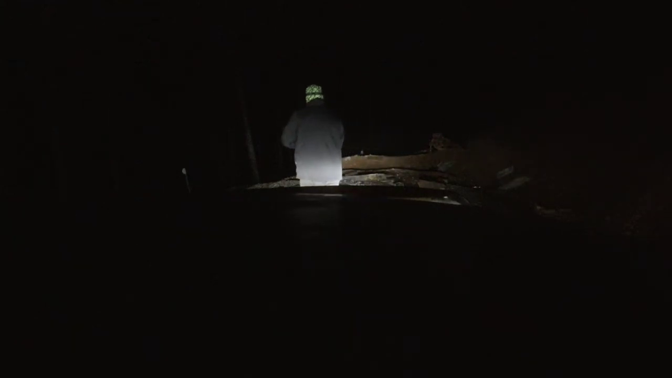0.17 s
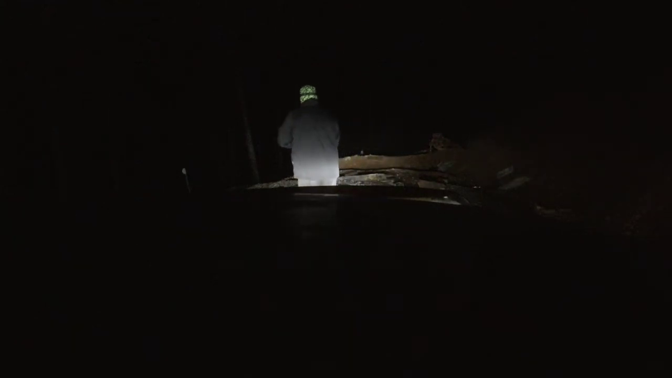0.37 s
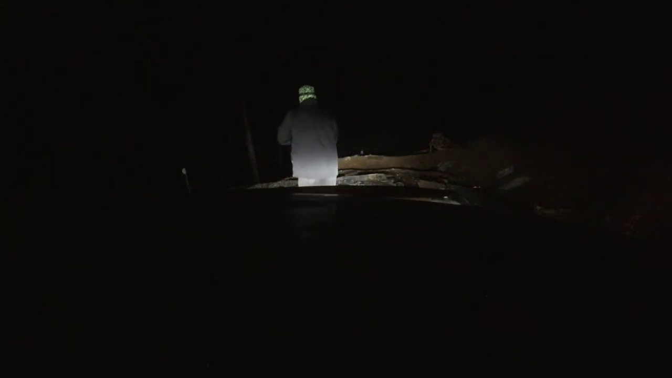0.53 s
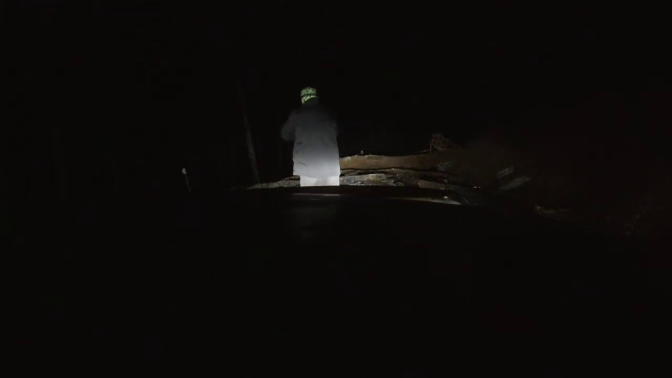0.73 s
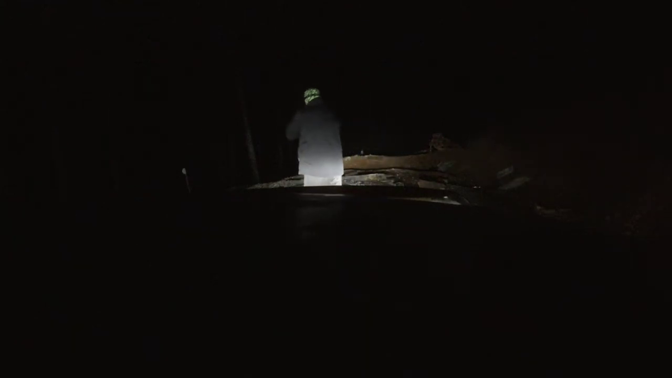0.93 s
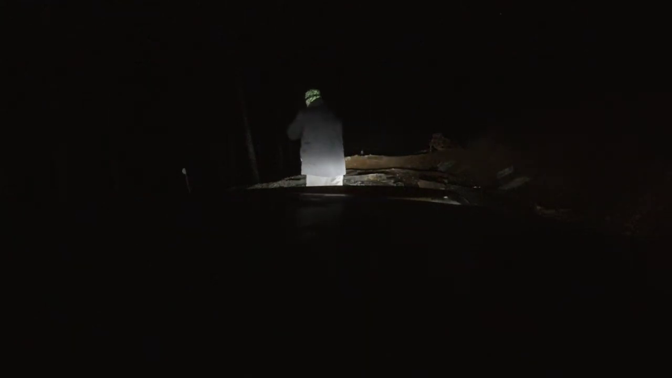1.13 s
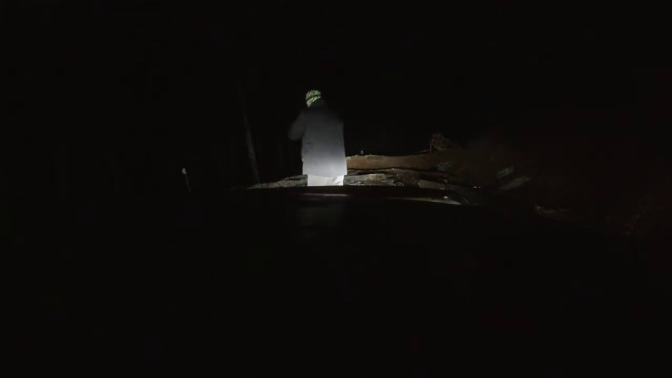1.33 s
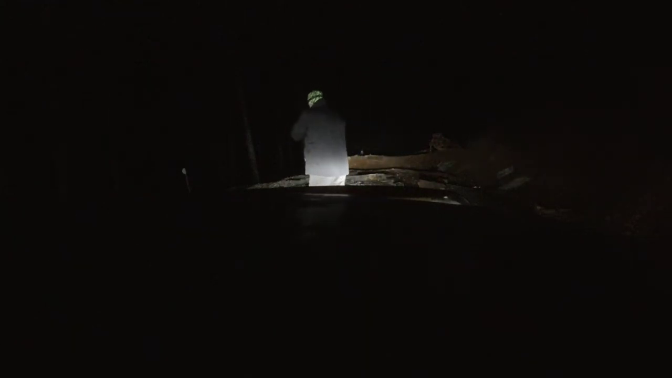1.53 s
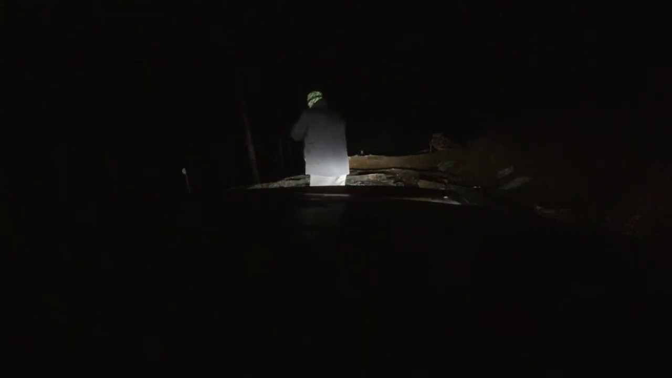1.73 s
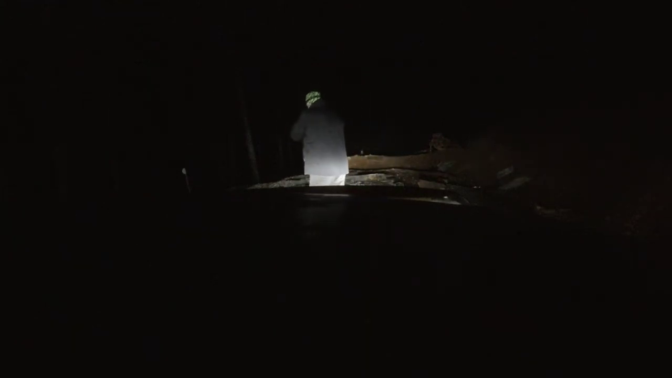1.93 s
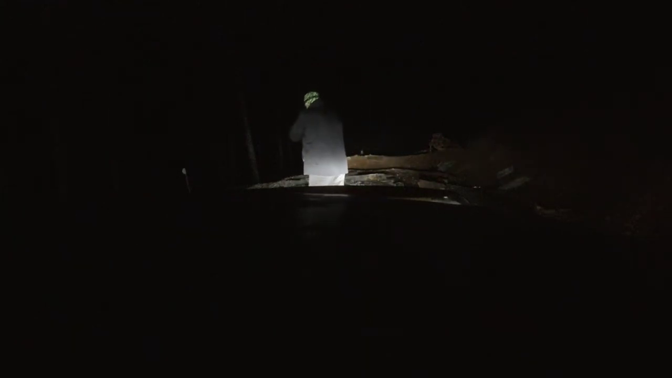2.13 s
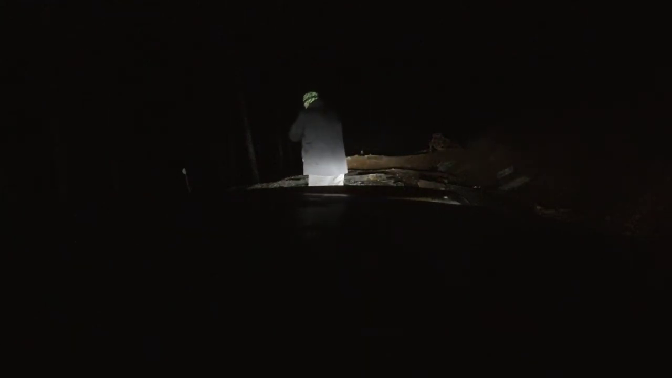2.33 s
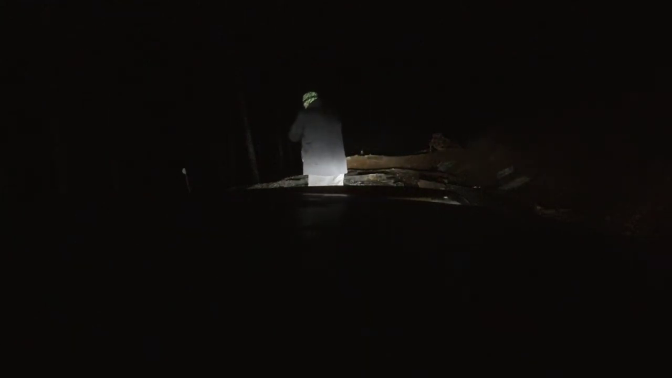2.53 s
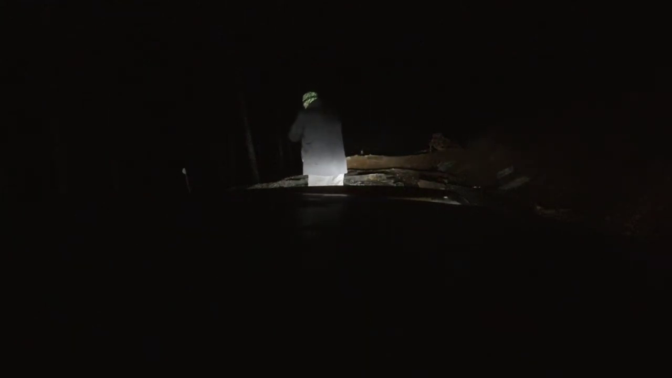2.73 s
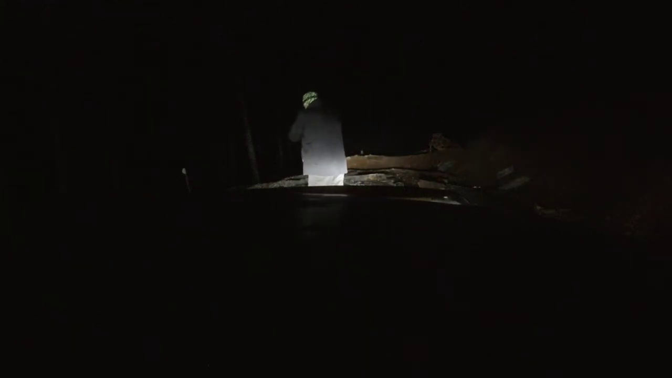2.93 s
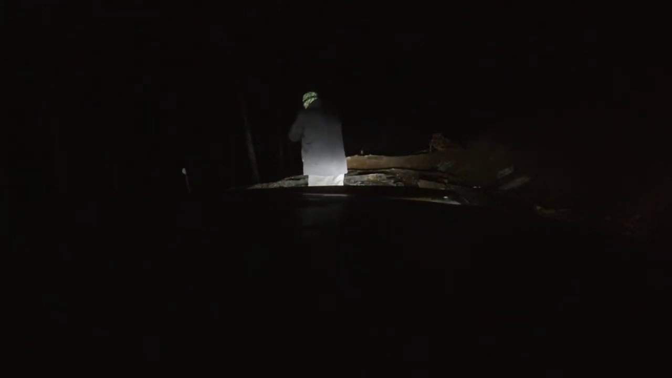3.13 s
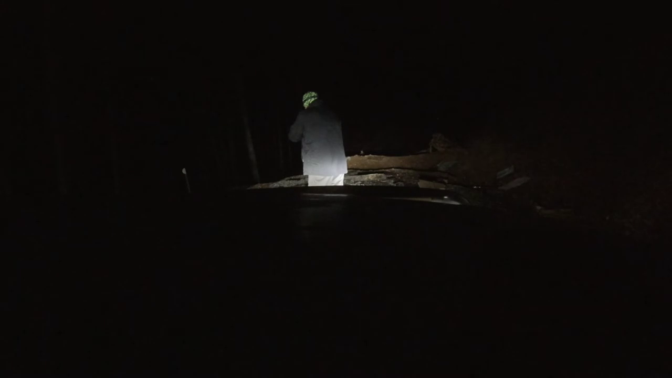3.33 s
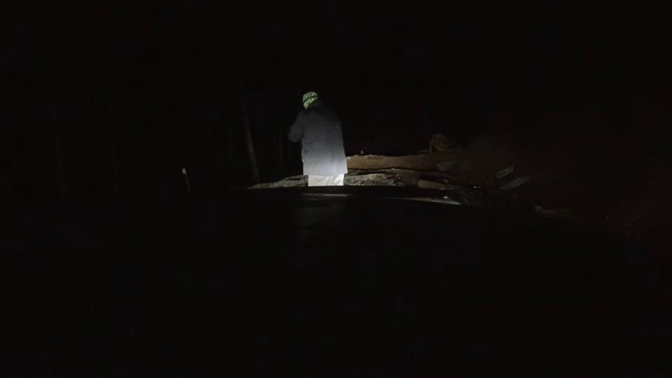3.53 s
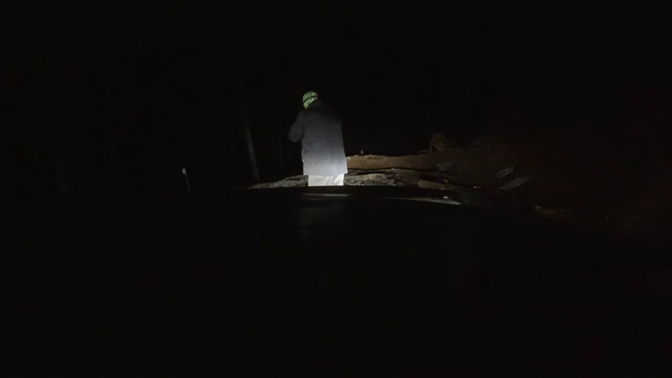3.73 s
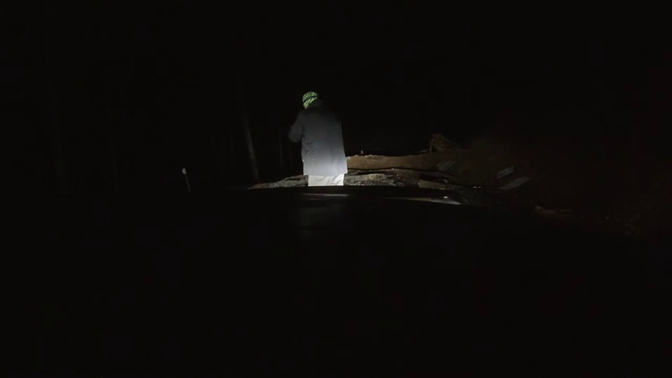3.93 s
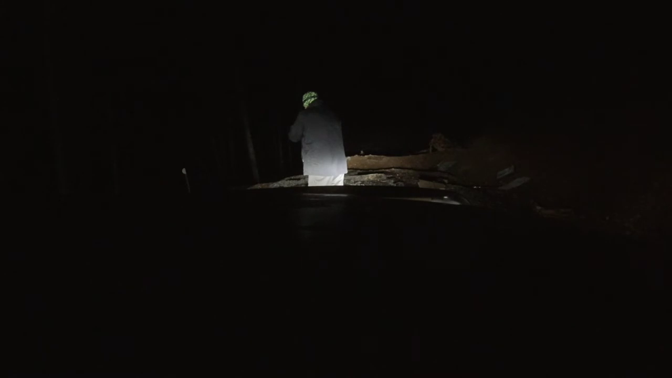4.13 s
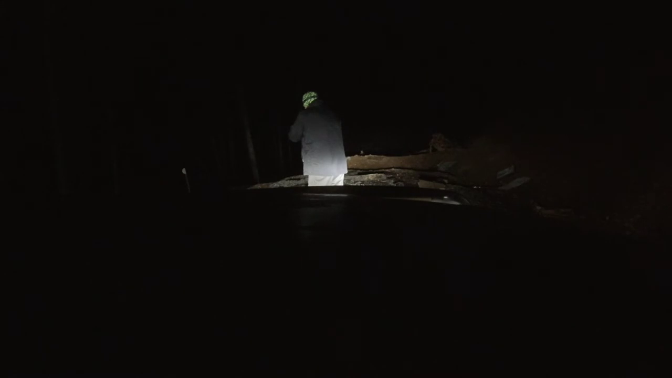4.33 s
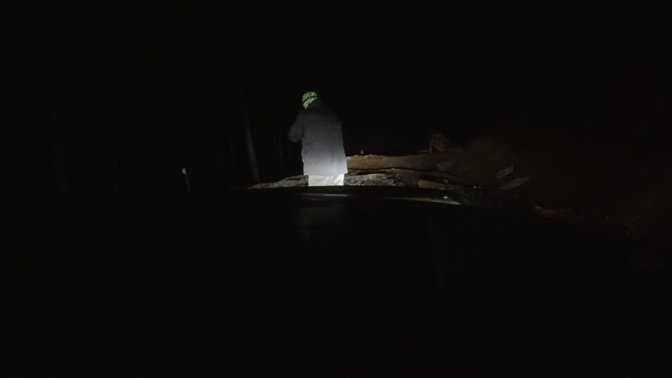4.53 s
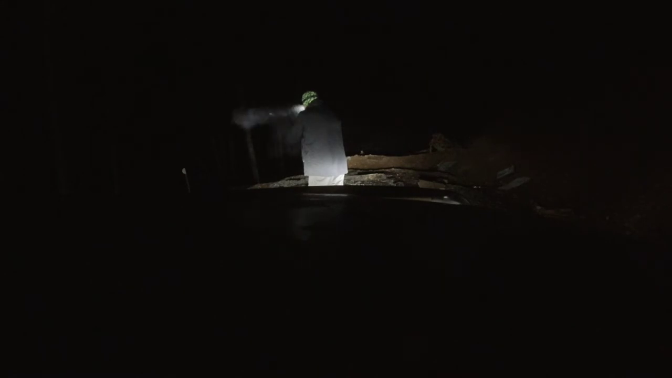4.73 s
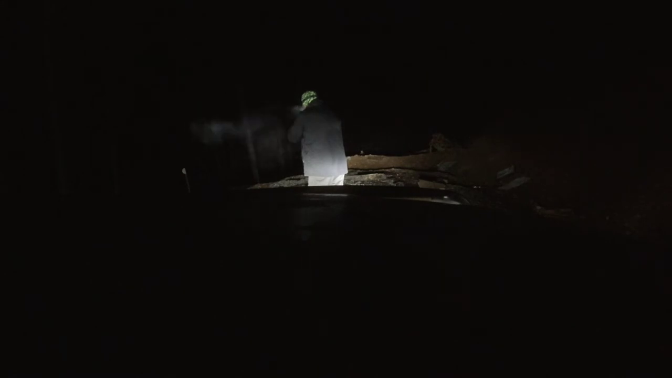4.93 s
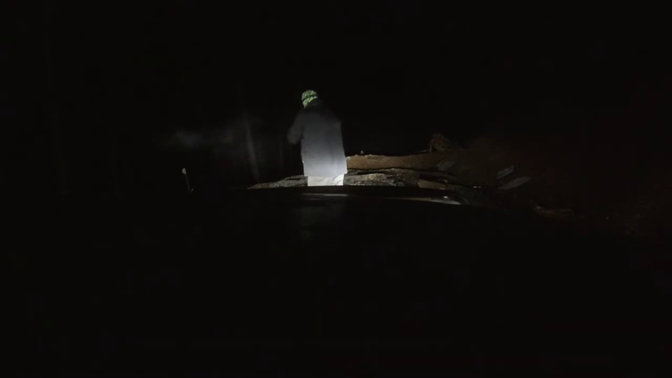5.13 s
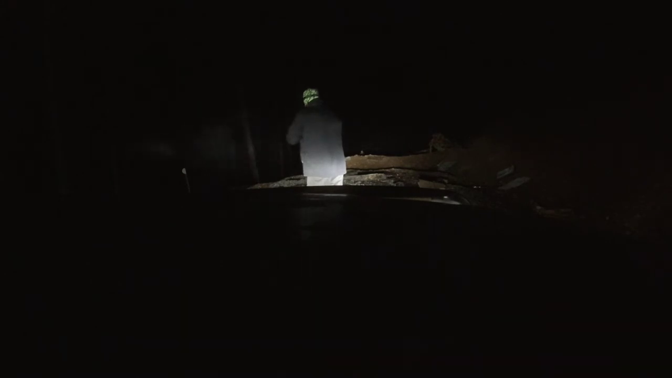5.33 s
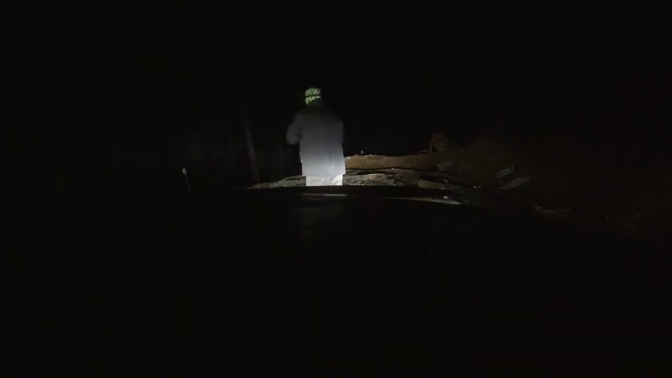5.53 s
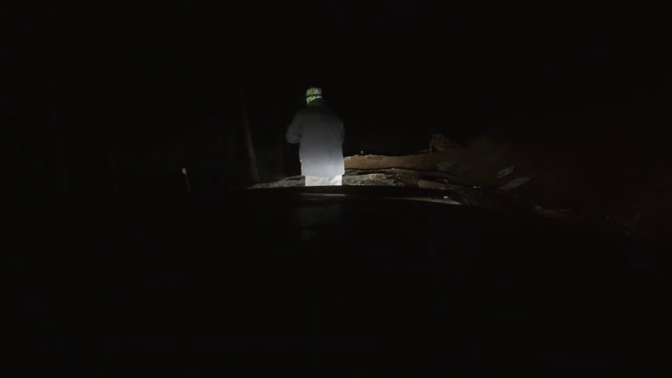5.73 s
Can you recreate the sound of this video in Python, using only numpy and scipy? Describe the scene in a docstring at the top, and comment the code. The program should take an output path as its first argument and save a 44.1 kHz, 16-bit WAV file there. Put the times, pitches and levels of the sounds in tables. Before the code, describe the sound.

Night, outdoors by a wood, heard through a camera microphone near an idling vehicle. From the start its fan gives a quiet, steady low hum near 190 Hz inside a soft rush of air, growing slightly in the first second. Light wind thumps and flutters deep and low, with a stronger buffet around 3.7 s; faint dry rustling stirs, most noticeably near 0.2 s, and a tiny tick comes at 3.4 s. At about 4.64 s a single pistol shot goes off close ahead: a hard, saturated crack and throaty roar with a bright sizzle and short metallic panel ring. Slapping reflections follow within 0.3 s, with crisp cracks from downrange at about 4.95 s. Dense echoes through the trees decay and lose treble; a dull boom swells from the far slope around 5.4 s, then fades. The hum and wind remain strongly ducked afterward.

```python
"""Edge of a wood at night: one shot from a short rifle-calibre pistol, a few metres ahead of an idling vehicle.
Pressure fronts, a noise roar and sharp cracks make the blast; damped sines ring the vehicle's panels.
Decaying noise is the scatter from the trees, a dull noise swell the far slope, and cracks return from downrange.
The vehicle's fan (blade tone and rush of air) hums under light wind, faint rustling and one tick.
The blast saturates the camera's microphone, and its gain control then ducks everything."""
import sys
import numpy as np
from scipy import signal
from scipy.fft import rfft, irfft
from scipy.io import wavfile

SR = 44100
rng = np.random.default_rng(int(sys.argv[2]) if len(sys.argv) > 2 else 0)


def unload_audio(sound):
    """Save the sound as a 16-bit wav file, at the path given as the first command line argument."""
    columns = np.transpose(np.atleast_2d(sound))
    # keep every value between -1 and 1, then stretch to whole-number steps
    steps = np.round(np.clip(columns, -1, 1) * 32767)
    wavfile.write(sys.argv[1], SR, steps.astype(np.int16))


N = 259749
TIME = np.arange(N) / SR
SHOT_S = 4.6351
AGE = np.maximum(TIME - SHOT_S, 0)  # seconds since the shot
# left-right likeness of sound that arrives through the air: [f/Hz, likeness 0-1]
AIRBORNE_LIKENESS = [(60, 0.9), (130, 0.95), (300, 0.97), (640, 0.95), (1400, .72), (3100, 0.2),
                     (6000, .05), (15000, 0.7)]


def amp(db):
    """Decibels to gain."""
    return 10 ** (np.asarray(db) / 20)


def unit(x):
    """Scales to rms 1."""
    return x / np.sqrt(np.mean(x ** 2) + 1e-20)


def curve(rows):
    """Joins (t/s, value) points by straight lines, at every sample."""
    return np.interp(TIME, *np.transpose(rows))


def read(points, hz):
    """Reads a spectrum table on a log-frequency axis."""
    f, value = np.transpose(points)
    return np.interp(np.log(hz + 1), np.log(f + 1), value)


def bump(s, half_s):
    """A smooth hill of height 1 around s."""
    return np.exp(-((TIME - s) / half_s) ** 2)


def swell(s, crest_s, sharpness):
    """Rises from s to 1 after crest_s, then dies away."""
    u = np.maximum(TIME - s, 0) / crest_s
    return (u * np.exp(1 - u)) ** sharpness


def drift(rate_hz):
    """Random wavering of rms 1: noise with a Gaussian roll-off above rate_hz."""
    hz = np.fft.rfftfreq(N, 1 / SR)
    return unit(irfft(rfft(rng.standard_normal(N)) * np.exp(-(hz / rate_hz) ** 2), N))


def noise(colour, likeness, grain=1):
    """A coloured stereo noise of rms 1; grain makes it lumpy in time."""
    hz = np.fft.rfftfreq(N, 1 / SR)
    mid, side = rfft(rng.standard_normal((2, N)) * grain) * amp(read(colour, hz))
    same = np.clip(read(likeness, hz), -1, 1)
    mid = mid * np.sqrt(1 + same)
    side = side * np.sqrt(1 - same)
    return unit(irfft(np.array([mid + side, mid - side]), N))


def lag_right(pair, count=2):
    """The right port hears the sound a few samples late."""
    return np.array([pair[0], np.pad(pair[1], (count, 0), mode="edge")[:N]])


def fronts(rise_hz=3300, low_hz=110, level_db=4.9, bearing_ms=.05):
    """Each front is a jump of pressure that falls through zero into a longer suction, from its own side."""
    # the blast and its bounces off the ground and single trunks:
    # [t/s, relative peak level/dB, length of the overpressure/ms]
    arrivals = [(4.6353, 25, .45), (4.6378, 29, 1.1), (4.6420, 23, 1.1), (4.6983, 20, .7),
                (4.7121, 20, .45), (4.7459, 13, .7), (4.7492, 14, .4), (4.7695, 17.5, .7), (4.7811, 15, .9),
                (4.7852, 13, 1.1), (4.8625, 8, .5), (4.8866, 10, .35), (4.8985, 7, .4), (4.9712, 5.5, .9)]
    out = np.zeros((2, N))
    lags_ms = bearing_ms * rng.standard_normal(len(arrivals))
    for (s, db, push_ms), lag_ms in zip(arrivals, lags_ms):
        side_lag_s = np.array([[lag_ms], [0]]) / 1000
        u = (TIME - s - side_lag_s) / (push_ms / 1000)  # age in overpressure lengths
        pulse = (u > 0) * (1 - u) * np.exp(-np.clip(u, 0, 60))
        out += amp(db + level_db) * pulse
    out = signal.lfilter(*signal.butter(3, rise_hz, fs=SR), out)  # softens the jumps
    return signal.lfilter(*signal.butter(2, low_hz, "high", fs=SR), out)


def roar(level_db=11.0, t60=.27, ragged_db=3):
    """Muzzle gases roar off the nearby ground: a ragged, throaty noise burst that decays at once."""
    # colour of the roar: [f/Hz, relative level per Hz/dB]
    throat = [(120, -32), (240, -8), (390, 0), (500, -5.5), (650, -0.5), (950, -15), (1600, -13.5),
              (2700, -11), (5000, -30.5), (9000, -46.5)]
    ragged = amp(ragged_db * drift(rate_hz=130))
    decay = amp(level_db - 60 * AGE / t60) * (TIME > SHOT_S)
    return decay * noise(throat, AIRBORNE_LIKENESS, grain=ragged)


def cracks(apart_db=-9):
    """Short band-limited noise bursts, decaying fast, reach both sides almost alike."""
    # first at the muzzle, then from downrange: [t/s, level/dB, centre f/Hz, width/octaves, t60/s]
    bursts = [(4.6356, 22, 1900, .6, .012), (4.9372, -16, 4700, .55, .055), (4.9500, 1.5, 2200, .6, .016),
              (4.9527, -6, 2700, .42, .025)]
    octave = np.log2(np.fft.rfftfreq(N, 1 / SR) + 1)
    out = np.zeros((2, N))
    for s, db, hz, width, t60 in bursts:
        fade = (TIME > s) * amp(db - 60 * np.maximum(TIME - s, 0) / t60)
        band = unit(np.exp(-.5 * ((octave - np.log2(hz)) / width) ** 2))
        mid, side = irfft(rfft(rng.standard_normal((2, N)) * fade) * band, N)
        out += mid + amp(apart_db) * np.array([side, -side])
    return out


def bodywork(ring_db=12.0):
    """The blast strikes the vehicle's panels, which ring briefly as damped sines of alternating sign."""
    # panel modes: [f/Hz, relative level/dB, t60/s]
    panels = [(122, -11, .3), (146, -11, .45), (247, -9, .5), (305, -6, .42), (399, -1, .25),
              (434, -1, .36), (479, -5, .36), (515, -5, .36), (562, -7, .33), (682, -12, .3),
              (746, -9, .38), (801, -7, .38), (932, -11, .35), (1010, -13, .35), (1107, -12, .35),
              (1405, -15, .35), (1620, -14, .35), (2088, -16, .35), (2415, -17, .35)]
    age = AGE[AGE > 0]
    ring = np.zeros(len(age))
    for k, (hz, db, t60) in enumerate(panels):
        ring += (-1) ** k * amp(db - 60 * age / t60) * np.sin(2 * np.pi * hz * age)
    return amp(ring_db) * np.pad(ring, (N - len(age), 0))


def roll_db(crest_db=16, build_s=0.028, build_db=7.5, spread_db_per_decade=20, absorb_db_per_s=15):
    """Level of the scatter: a quick build-up, then spreading and absorption, lifted by large reflectors."""
    # two stands of trees and the far slope: [t/s, half length/s, extra level/dB]
    reflectors = [(4.873, 0.052, 3), (4.98, 0.041, 4.5), (5.462, 0.15, 4.5)]
    build = build_db * np.minimum(AGE / build_s - 1, 0)
    spread = spread_db_per_decade * np.log10(np.maximum(AGE / build_s, 1))
    lift = sum(db * bump(s, half_s) for s, half_s, db in reflectors)
    return crest_db + build - spread - absorb_db_per_s * AGE + lift


def woods(lumpy_db=0.5, clumps_db=0.6, air_power=1.66, air_db_per_s=0.92, undergrowth_db_per_s3=1.56):
    """Countless echoes as clumpy noise; the later they come, the more treble air and undergrowth take."""
    # colour of the scatter before it is dulled: [f/Hz, relative level per Hz/dB]
    scatter = [(25, -14.5), (60, -9.5), (95, -2), (150, 1), (330, 3), (680, -1.5), (1350, -7.5),
               (2700, -10.5), (4000, -14), (5200, -21), (7600, -28.5), (10000, -17), (12500, -21),
               (15500, -22.5)]
    grain = amp(lumpy_db * drift(rate_hz=400) + clumps_db * drift(rate_hz=50))
    hz, t, z = signal.stft(noise(scatter, AIRBORNE_LIKENESS, grain), SR, nperseg=512)
    age = np.maximum(t - SHOT_S, 0)
    # loss at 1 kHz: steady in the air, ever faster deep in the undergrowth
    loss_1k_db = air_db_per_s * age + undergrowth_db_per_s3 * age ** 3
    loss_db = loss_1k_db * (hz[:, None] / 1000) ** air_power
    dulled = signal.istft(z * amp(-loss_db), SR, nperseg=512)[1][:, :N]
    return dulled * amp(roll_db()) * (TIME > SHOT_S)


def slope(level_db=-22.0):
    """The far slope returns a soft, dull boom about three quarters of a second after the shot."""
    # colour of the boom: [f/Hz, relative level per Hz/dB]
    boom = [(60, -31), (130, -26), (210, 0.5), (420, -6.5), (700, -13), (2500, -21), (6000, -56),
            (12000, -95)]
    return amp(level_db) * noise(boom, AIRBORNE_LIKENESS) * swell(s=5.34, crest_s=.095, sharpness=2.2)


def fan(tone_db=-41, blade_hz=190.5, wander_hz=.5, waver_db=0.5,
        rush_db=-47.0, rise_db=2.5, rise_s=1, flicker_db=.55, dip_s=.022):
    """A wandering blade tone with a few partials, in a soft rush of air that grows a little at first."""
    # partials of the blade tone: [multiple, relative level/dB]
    partials = [(1, -0.5), (2, -16), (8, -30), (10, -34)]
    # colour of the rush: [f/Hz, relative level per Hz/dB]
    air = [(60, 0), (140, -20.5), (180, 13), (250, -12), (400, -5.5), (780, -1.5), (1100, -3.5),
           (1450, -11.5), (2100, -13), (3000, -25.5), (4500, -39.5), (6300, -51.5), (12500, -45.5),
           (14000, -65)]
    # the tone dips briefly: [t/s, level change/dB]
    dips = [(3.025, -21), (3.415, -14)]
    turns = np.cumsum(blade_hz + wander_hz * drift(rate_hz=6)) / SR
    tone = np.zeros(N)
    for k, db in partials:
        tone += amp(db + waver_db * drift(rate_hz=18)) * np.sin(2 * np.pi * k * turns)
    dips_db = sum(db * bump(s, dip_s) for s, db in dips)
    hum = np.sqrt(2) * amp(tone_db + dips_db) * tone
    level_db = rush_db - rise_db * np.exp(-TIME / rise_s) + flicker_db * drift(rate_hz=16)
    return hum + amp(level_db) * noise(air, AIRBORNE_LIKENESS)


def wind(flutter_db=-2, lumpy_db=2.0, swell_db=1.0):
    """Eddies thump each microphone port on its own: a light breeze, and now and then a buffet."""
    # left-right likeness of the eddies: [f/Hz, likeness 0-1]
    turbulent = [(40, 0.12), (100, 0.34), (200, 0.48)]
    # colours of the deep thumps and of the flutter: [f/Hz, relative level per Hz/dB]
    thump_colour = [(10, -15), (24, -1), (44, 3), (65, -12), (130, -33.5), (2000, -110)]
    flutter_colour = [(30, -23.5), (60, 1), (97, -1), (135, -8.5), (260, -11), (500, -35.5), (2000, -74),
                      (8000, -110)]
    # the breeze, before its random swelling: [t/s, thump level/dB]
    breeze = [(0, -47.5), (.55, -54.5), (.85, -48), (1.9, -47), (2.2, -51), (2.95, -50.5), (3.4, -41.5),
              (4.55, -45.5), (5.5, -53)]
    # single buffets above it: [t/s, half length/s, deep thump level/dB, flutter level/dB]
    buffets = [(0.316, .05, -49.5, -65), (0.915, 0.083, -50.5, -51), (1.238, 0.036, -49.5, -47),
               (1.514, .045, -47.5, -41), (2.713, .03, -47, -43.5), (3.173, 0.13, -42, -71.5),
               (3.722, 0.13, -30, -43), (3.973, 0.065, -61.5, -42.5), (4.32, 0.08, -50.5, -38.5),
               (4.455, .03, -43.5, -57)]
    eddies = amp(lumpy_db * drift(rate_hz=59))
    breeze_db = curve(breeze) + swell_db * drift(rate_hz=5.5)
    deep = amp(breeze_db)
    flutter = amp(flutter_db + breeze_db)
    for s, half_s, deep_db, flap_db in buffets:
        hill = bump(s, half_s)
        deep += amp(deep_db) * hill
        flutter += amp(flap_db) * hill
    thumps = deep * noise(thump_colour, turbulent, grain=eddies)
    return thumps + flutter * noise(flutter_colour, turbulent, grain=eddies)


def rustle(steady_db=-78, stir_db=2.0, lumpy_db=3):
    """Dry leaves or cloth stir faintly all the time as lumpy noise, and now and then a little more."""
    # colour of the rustling: [f/Hz, relative level per Hz/dB]
    dry_colour = [(1000, -21), (2600, 2), (3600, -3), (4300, -16.5), (4750, -10), (5300, -27),
                  (8000, -36.5)]
    # stronger rustles: [t/s, half length/s, level/dB]
    stirs = [(0.183, 0.039, -63), (0.822, 0.21, -72), (2.903, 0.43, -78), (3.65, 0.076, -76.5)]
    level = amp(steady_db + stir_db * drift(rate_hz=8))
    level += sum(amp(db) * bump(s, half_s) for s, half_s, db in stirs)
    lumps = amp(lumpy_db * drift(rate_hz=120))
    return level * noise(dry_colour, AIRBORNE_LIKENESS, grain=lumps)


def tick(level_db=-36, tick_s=3.3893, decay_s=.0004):
    """One faint dry tick: a negative jump that decays exponentially."""
    return -amp(level_db) * (TIME > tick_s) * np.exp(-np.maximum(TIME - tick_s, 0) / decay_s)


def housing(x):
    """The camera's housing rings a little: resonant peaks added to a flat response."""
    # resonances: [f/Hz, width/Hz, level/dB; 0 dB adds nothing]
    resonances = [(1620, 120, 2.5), (2640, 92, 1), (3700, 140, 1), (5290, 200, 2.5)]
    hz = np.fft.rfftfreq(N, 1 / SR)
    colour = 1
    for centre, width, db in resonances:
        colour = colour + (amp(db) - 1) / (1 + 2j * (hz - centre) / width)
    return irfft(rfft(x) * colour, N)


def sizzle(level_db=-3.0):
    """A bright noise swells just after the blast and is mostly gone in a tenth of a second."""
    # colour of the sizzle: [f/Hz, relative level per Hz/dB]
    bright = [(1000, -17.5), (2600, 1.5), (4500, 3.5), (7600, -1.5), (9900, 6), (12000, -1.5), (15500, -7)]
    return amp(level_db) * noise(bright, AIRBORNE_LIKENESS) * swell(SHOT_S, crest_s=0.029, sharpness=0.83)


def scene():
    """The shot and its echoes over the idling vehicle and the wind."""
    shot = fronts() + roar() + cracks() + bodywork() + woods() + slope()
    return shot + lag_right(fan()) + wind() + rustle() + tick()


def record(dry, overload_db=18.5, limit_db=-4.5, recovery_db_per_s=6.0, edge_hz=15850):
    """The microphone saturates and sizzles; gain drops at once and recovers slowly; then the band limit."""
    squashed = amp(overload_db) * np.tanh(housing(dry) / amp(overload_db))
    peak_db = 20 * np.log10(abs(squashed).max(0) + 1e-9)
    # hold the highest peak so far, letting it fall at the recovery rate
    fall = recovery_db_per_s * TIME
    held_db = np.maximum.accumulate(peak_db + fall) - fall
    over_db = np.maximum(held_db - limit_db, 0)
    ducked = (squashed + sizzle()) * amp(-over_db)  # the sizzle rides on top of the flattened crests
    lowpass = signal.firwin(511, edge_hz, window=("kaiser", 9), fs=SR)
    return signal.oaconvolve(ducked, lowpass[None], "same", axes=1)


dry = scene()
out = record(dry)
unload_audio(out)
```